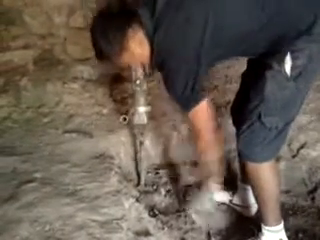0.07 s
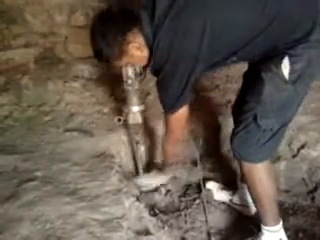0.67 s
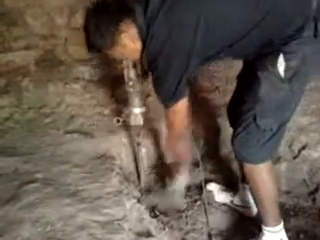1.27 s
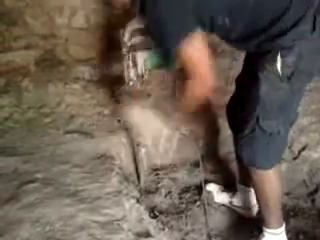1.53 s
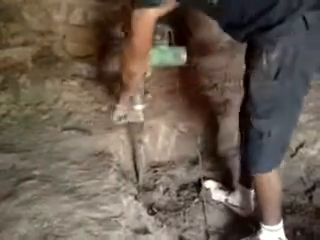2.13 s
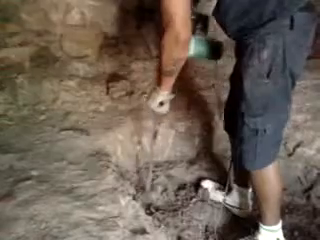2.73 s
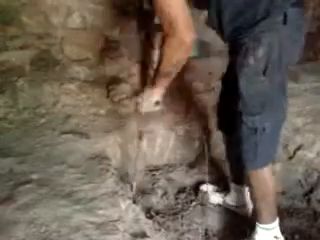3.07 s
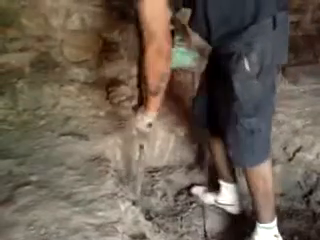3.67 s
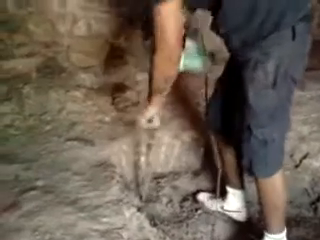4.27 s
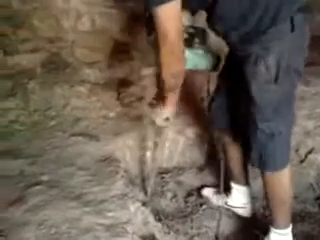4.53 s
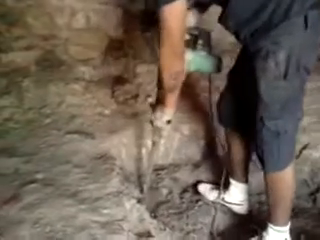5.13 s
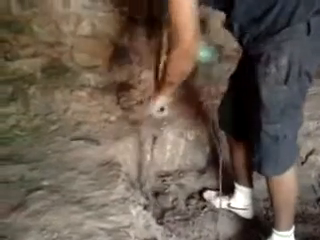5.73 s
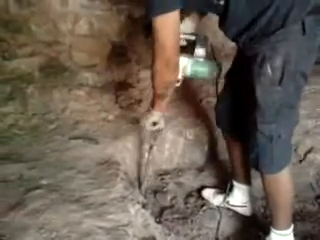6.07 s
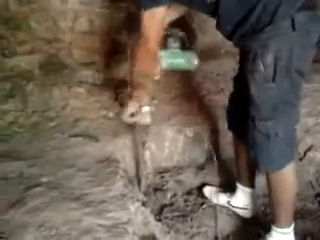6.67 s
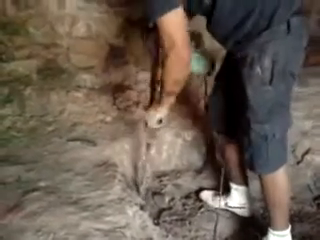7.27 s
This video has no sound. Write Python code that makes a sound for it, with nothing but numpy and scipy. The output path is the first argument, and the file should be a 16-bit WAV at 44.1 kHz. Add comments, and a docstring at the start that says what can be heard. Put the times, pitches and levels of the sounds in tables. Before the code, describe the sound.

Loud electric hammer chiselling stone in an echoing pit, its motor whining, with one short letup where the loose chisel clanks.

```python
"""An electric demolition hammer chisels rock in a narrow stone pit, whose echo smears the blows into a roar.
Its gears and fan whine. After a second the trigger is released: the motor coasts and the loose chisel clanks.
Near two seconds it whines back up to speed and hammers on, the chisel now wedging and singing, now ringing out
on hard stone, now sinking into rubble. Throughout, the highest peaks overload a small microphone close by with
a faint crackle."""
import sys
import numpy as np
from scipy import signal
from scipy.fft import rfft, irfft, next_fast_len
from scipy.io import wavfile
from scipy.ndimage import uniform_filter1d, map_coordinates

SR = 44100
rng = np.random.default_rng(int(sys.argv[2]) if len(sys.argv) > 2 else 0)


def wav_record(signal):
    """Record a signal, one row per channel, as 16-bit PCM in the file named by sys.argv[1]."""
    frames = np.transpose(np.atleast_2d(signal))
    bounded = np.clip(frames, -1, 1)
    # unit amplitude maps onto the largest positive 16-bit level
    quanta = np.round(bounded * 32767).astype(np.int16)
    wavfile.write(sys.argv[1], SR, quanta)


N = 321489

# The tone colours of struck rock, housing and chisel. Each row: frequency in Hz, relative level in dB.
ROCK_SPECTRUM = [(100, -50), (400, -19), (600, -4), (820, -1), (1000, -1.5), (1280, -1), (1550, -2),
                 (2100, -18), (4500, -45), (6000, -78)]
HOUSING_SPECTRUM = [(300, -38), (1200, -14), (1600, -2.5), (2000, 1.5), (2400, -2), (2850, 0), (3200, 0),
                    (3550, 0.5), (3850, -8.5), (4500, -25.5), (6000, -78.5)]
CHISEL_SPECTRUM = [(500, -39.5), (2500, -15.5), (3150, -7), (3450, -6.5), (3720, -1.5), (3950, 0.5),
                   (4200, -3.5), (4600, -8), (6000, -79)]
# The motor labours and whines louder. Each row: start in seconds, length in seconds, pitch sag in Hz
# (a lift if negative), boost in dB.
LABOURS = [(.11, .22, 30, 3.5), (0.572, 0.077, 30, 6), (2.516, .09, -40, 9), (3.105, .19, 230, 3.5),
           (4.129, .27, 10, 6.5), (4.75, .65, 130, 4), (5.54, 0.16, 270, 6), (6.19, 0.36, 99.5, 5.5),
           (6.9, .3, 61.5, 5)]
# Motor speed is given as the pitch of the gear whine: at a start, flat out, and where blows hit full force.
START_HZ, FULL_HZ, STRIKE_HZ = 1792.4, 3397, 3060


def amp(db):
    """Decibels to gain."""
    return 10 ** (np.asarray(db) / 20)


def unit(x):
    """Scaled to rms 1."""
    return x / np.sqrt(np.mean(x ** 2) + 1e-20)


def spells(starts, lengths, sizes, edge_s):
    """A curve that moves to each size for the length of its spell, with soft edges."""
    t = np.arange(N) / SR
    return sum(size * (np.tanh((t - start) / edge_s) - np.tanh((t - start - length) / edge_s)) / 2
               for start, length, size in zip(starts, lengths, sizes))


def wobble(rate):
    """A smooth random curve, rate knots a second."""
    knots = rng.standard_normal(int(N * rate / SR) + 4)
    return map_coordinates(knots, [np.arange(N) * rate / SR])


def filtered(x, response):
    """x shaped by a gain that depends on frequency."""
    size = next_fast_len(N + SR // 2)
    return irfft(rfft(x, size) * response(np.fft.rfftfreq(size, 1 / SR)), size)[:N]


def coloured(x, points):
    """x through an EQ curve of (Hz, dB) points joined on a log axis."""
    point_hz, db = np.transpose(points)
    return filtered(x, lambda hz: amp(np.interp(np.log(hz + 1), np.log(point_hz), db)))


def dying(energy, t60):
    """Energy lingers and falls 60 dB in t60 seconds; its sum is kept."""
    keep = np.exp(-np.log(10 ** 6) / (t60 * SR))
    return signal.lfilter([1 - keep], [1, -keep], energy)


def ringing(spectrum, patchy_db):
    """Crowded resonances: coloured noise of rms 1 in which random bands stand out for a moment."""
    noise = signal.stft(rng.standard_normal(N), nperseg=1024)[2]
    patches = uniform_filter1d(rng.standard_normal(noise.shape), size=4, axis=0)
    patches = unit(uniform_filter1d(patches, size=3, axis=1))
    patchy = signal.istft(noise * amp(patchy_db * patches), nperseg=1024)[1][:N]
    return unit(coloured(patchy, spectrum))


def blurred_tone(hz, width_hz):
    """A tone of rms 1, shaken by the blows and smeared by the walls."""
    phase = 2 * np.pi * np.cumsum(hz * np.ones(N)) / SR
    return unit(wobble(width_hz) * np.cos(phase) + wobble(width_hz) * np.sin(phase))


def drive(surge_s=0.085, surge_share=0.45, climb_s=0.42, coast_s=1.1, swell_s=0.046, let_go_s=0.11):
    """The motor surges, climbs, then coasts when let go. Gives speed (Hz), effort (0-1) and level (dB)."""
    # The trigger is held. Each row: press in seconds, release in seconds.
    trigger = [(-.135, 1.0), (1.91, 7.4)]
    t = np.arange(N) / SR
    hz, effort, powered = np.zeros((3, N))
    for pressed, released in trigger:
        run = np.clip(t - pressed, 0, released - pressed)
        coast = np.maximum(t - released, 0)
        lag = surge_share * np.exp(-run / surge_s) + (1 - surge_share) * np.exp(-run / climb_s)
        power = (1 - np.exp(-(run / swell_s) ** 2)) * np.exp(-coast / let_go_s)
        speed = (FULL_HZ - (FULL_HZ - START_HZ) * lag) * np.exp(-coast / coast_s)
        hz = np.where(t >= pressed, speed, hz)
        effort += power * lag  # greatest just after the press, gone at full speed
        powered += power
    starts, lengths, sag_hz, _ = np.transpose(LABOURS)
    hz -= spells(starts, lengths, sag_hz, edge_s=0.028)
    hz += 20 * ring_out_db()  # a ringing chisel unloads the motor: 20 Hz per dB
    return hz, effort, -3.3 * (1 - powered)  # quieter without power


def force(speed_hz):
    """Strength of the blows (0-1); they weaken steeply below striking speed."""
    return np.minimum(speed_hz / STRIKE_HZ, 1) ** 2.23


def pounding(speed_hz, direct_share, teeth_per_blow=148, scatter_db=2.5,
             rattle_rate=230, rattle_share=0.64, blow_t60=0.033, pit_t60=0.88):
    """Envelope of the piston's blows and the rebounds between them, drawn out by the pit."""
    crank_turns = np.floor(np.cumsum(speed_hz) / teeth_per_blow / SR)
    blows = np.diff(crank_turns, prepend=0) * amp(scatter_db * rng.standard_normal(N)) ** 2
    rebounds = (rng.random(N) < rattle_rate / SR) * rng.exponential(size=N)
    energy = (1 - rattle_share) * blows / blows.mean() + rattle_share * rebounds / rebounds.mean()
    echo = 1 + dying(energy - 1, pit_t60)  # the pit is already full of sound
    return np.sqrt(np.abs(direct_share * dying(energy, blow_t60) + (1 - direct_share) * echo))


def hammer(speed_hz, ground_db=0.5, rock_db=-21.5, housing_db=-18.5, chisel_db=-19.5, seated_s=2.55):
    """Every blow thuds into the ground, cracks the rock and rings the housing and the chisel."""
    # The ground's deep tone colour. Each row: frequency in Hz, relative level in dB.
    ground_spectrum = [(18, -39.5), (32, -20), (60, -5), (120, -2), (280, 2), (480, 4), (700, 2),
                       (1400, -36), (4000, -66)]
    # The thud swells and eases. Each row: time in seconds, relative level in dB.
    thud_levels = [(0, -32.5), (1.0, -30.5), (1.25, -30), (1.58, -32.5), (1.66, -21), (1.92, -28),
                   (2.3, -31), (2.7, -33.5), (3.4, -35.5), (3.72, -26.5), (4.05, -28.5), (4.38, -34.5),
                   (4.66, -28.5), (5.3, -29), (6.05, -33), (6.66, -28), (6.8, -29), (7.2, -32.5)]
    # Loose rubble muffles the tip. Each row: start in seconds, length in seconds, dip of the rock in dB.
    sinks = [(0.808, 0.083, -3), (3.079, .12, -2), (4.248, .19, -2), (5.455, 0.091, -3.5),
             (7.026, .15, -1.5)]
    t = np.arange(N) / SR
    thud_db = np.interp(t, *np.transpose(thud_levels))
    sink_db = spells(*np.transpose(sinks), edge_s=0.041)
    ring_db = ring_out_db()
    unseated = (1 - np.tanh((t - seated_s) / 0.05)) / 2  # the housing rattles more until the tip seats
    rock_gain = amp(rock_db + 0.18 * (thud_db - thud_db.mean()) + 1.07 * unseated + sink_db)
    housing_gain = amp(housing_db + 3 * unseated - 0.19 * ring_db + 0.33 * sink_db)
    chisel_gain = amp(chisel_db - 4 * unseated + ring_db)
    thud = amp(ground_db + thud_db) * ringing(ground_spectrum, patchy_db=1.7)
    crack = rock_gain * ringing(ROCK_SPECTRUM, patchy_db=2.0)
    clatter = housing_gain * ringing(HOUSING_SPECTRUM, patchy_db=2.0)
    steel = chisel_gain * ringing(CHISEL_SPECTRUM, patchy_db=2.5)
    # the stone, the machine and the bare chisel each rebound in their own way
    return force(speed_hz) * (pounding(speed_hz, direct_share=0.21) * (thud + crack)
                              + pounding(speed_hz, direct_share=0.17) * clatter
                              + pounding(speed_hz, direct_share=0.2) * steel)


def motor(speed_hz, effort, whine_db=-27.5, fan_db=-14, line_hz=160, skirt_hz=520,
          judder_db=2.0, judder_rate=35, casing_hz=1293, casing_width_hz=34):
    """Gear whine, a narrow line on a rough skirt, with the fan an octave below; effort lifts both."""
    starts, lengths, _, boost_db = np.transpose(LABOURS)
    level_db = whine_db + 24 * effort + spells(starts, lengths, boost_db, edge_s=0.05)
    load = np.interp(speed_hz, [2850, 3350], [0.4, 1])  # the piston only strikes hard near full speed
    hz = speed_hz * (1 + 0.022 * load * wobble(judder_rate))  # the pounding tugs at the speed
    gears = unit(blurred_tone(hz, line_hz) + amp(-0.5) * blurred_tone(hz, skirt_hz))
    # the fan's tone swells as it sweeps through a resonance of the casing
    resonance_db = 11 / (1 + ((hz / 2 - casing_hz) / casing_width_hz) ** 2)
    fan = amp(fan_db + 17 * effort + resonance_db) * blurred_tone(hz / 2, line_hz)
    level_db += judder_db * load * wobble(judder_rate)
    speed_gain = np.minimum(hz / STRIKE_HZ, 1) ** 1.6
    return speed_gain * amp(level_db) * (gears + fan)


def overload_ticks(speed_hz, gain_db=3, hz=2900, width_s=0.00017, small_rate=4, small_db=-4.0):
    """Brief peaks in the roar that clip the microphone and tick; smaller ones fall at random."""
    # The loudest ticks. Each row: time in seconds, relative peak in dB.
    loudest = [(0.083, -1.5), (.094, -1), (0.131, -2), (.246, -1), (.576, -0.5), (.733, -0.5), (.797, -3.5),
               (.933, -4.5), (2.029, -2.5), (2.143, -2), (2.422, -2), (2.49, -1.5), (2.545, -2),
               (2.706, -1), (2.783, -1.5), (2.844, 2), (2.9, -0.5), (2.975, -0.5), (3.523, -9.5),
               (3.962, -2.5), (3.998, -3.5), (4.266, -2), (4.527, -0.5), (5.098, -2.5), (5.175, 1.5),
               (5.626, 2), (5.856, -.5), (5.912, -3), (6.496, 0), (6.54, -3.5), (6.673, -0.5), (6.849, -2),
               (6.917, 0), (7.073, 3.5), (7.21, 3.5), (7.256, -6.5)]
    times, db = np.transpose(loudest)
    loud = np.bincount(np.round(times * SR).astype(int), amp(db + gain_db), N)[:N]
    small = (rng.random(N) < small_rate / SR) * amp(small_db) * force(speed_hz)
    t = np.arange(-SR // 500, SR // 500) / SR
    spike = np.exp(-(t / width_s) ** 2) * np.cos(2 * np.pi * hz * t)
    return signal.fftconvolve((loud + small) * rng.choice([-1, 1], N), spike, "same")


def ring_out_db():
    """How far the chisel rings above its usual level when it meets hard stone."""
    # The ring-outs. Each row: start in seconds, length in seconds, boost in dB.
    ring_outs = [(0.693, 0.24, 3.5), (2.581, .435, 7), (3.21, .09, 5), (3.458, 0.086, 7), (5.825, .14, 8),
                 (6.063, 0.093, 7.5), (7.0, .35, 6.5)]
    return spells(*np.transpose(ring_outs), edge_s=0.02)


def sung_resonances(gain_db=1.0, width_hz=190):
    """A resonance swells and sings for a moment: steel and stone while the tip is held fast, or the casing as
    the coasting fan runs through it."""
    # The sung notes; the first three, while the motor coasts, are the casing's resonance as the fan runs down
    # through it. Each row: centre in seconds, pitch in Hz, half-length in seconds, relative level in dB.
    notes = [(1.018, 1278, 0.1, -28.5), (1.227, 1180, 0.042, -23.5), (1.788, 1194, .021, -24),
             (3.204, 777, .11, -24), (3.162, 2020, 0.13, -27), (3.392, 2080, 0.15, -25),
             (3.596, 1970, .11, -23), (3.904, 1642, .09, -21.5), (4.0, 794, 0.058, -21),
             (4.479, 1850, .07, -23.5), (5.462, 2560, 0.11, -27.5), (5.634, 1575, 0.17, -26),
             (6.823, 1568, 0.099, -24.5), (6.93, 850, 0.087, -25)]
    t = np.arange(N) / SR
    singing = np.zeros(N)
    for centre, hz, half_length, db in notes:
        swell = np.exp(-2 * ((t - centre) / half_length) ** 2)
        singing += amp(db + gain_db) * swell * blurred_tone(hz, width_hz)
    return singing


def clanks(gain_db=-4, housing_db=-2.0, t60=0.14):
    """The loose chisel knocks on rock and in the tool holder, each time with the pit's short tail."""
    # The knocks. Each row: start in seconds, relative levels of the dull knock and the steel ring in dB.
    knocks = [(1.157, -14.5, -20.5), (1.243, -11, -17.5), (1.311, -15, -16.5), (1.413, -17.5, -10.5),
              (1.519, -13, -30), (1.559, -17, -38), (1.648, -15.5, -11), (1.691, -19, -24.5),
              (1.813, -15, -13), (1.86, -20, -22), (1.885, -19, -25), (1.926, -18, -16),
              (1.947, -13, -16.5)]
    t = np.arange(SR // 3) / SR
    spectra = ROCK_SPECTRUM, HOUSING_SPECTRUM, CHISEL_SPECTRUM
    energy = np.zeros((3, N + SR))
    for start, knock_db, ring_db in knocks:
        parts_db = np.array([knock_db, knock_db + housing_db, ring_db])
        onset = round(start * SR)
        energy[:, onset:onset + len(t)] += amp(gain_db + parts_db[:, None] - 60 * t / t60) ** 2
    return sum(envelope * ringing(spectrum, patchy_db=5.0)
               for envelope, spectrum in zip(np.sqrt(energy[:, :N]), spectra))


def saturated(x, top, hardness):
    """Peaks rounded off at top; the greater the hardness, the sharper the corner."""
    return x / (1 + np.abs(x / top) ** hardness) ** (1 / hardness)


def scene():
    """The hammer, its motor, the peaks in the roar and the chisel, wedged or loose."""
    speed_hz, effort, coast_db = drive()
    machine = amp(coast_db) * (hammer(speed_hz) + motor(speed_hz, effort))
    return (machine + overload_ticks(speed_hz) + sung_resonances() + clanks())[None]


def record(dry):
    """Peaks are rounded off, the treble falls away steeply above 4 kHz, and what still overshoots is clipped,
    which adds thin ticks."""
    # The steep treble roll-off above 4 kHz. Each row: frequency in Hz, gain in dB.
    roll_off = [(3700, 0.5), (3950, -7.5), (4200, -10.5), (4400, -21), (4600, -27.5), (4900, -44.5),
                (5600, -85), (7000, -100)]
    narrow = coloured(saturated(dry[0], top=0.84, hardness=4.48), roll_off)
    clipped = saturated(narrow, top=0.71, hardness=40)
    return filtered(clipped, lambda hz: hz < 15870)[None]


dry = scene()
out = record(dry)
wav_record(out)
```